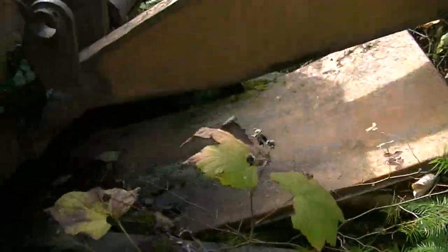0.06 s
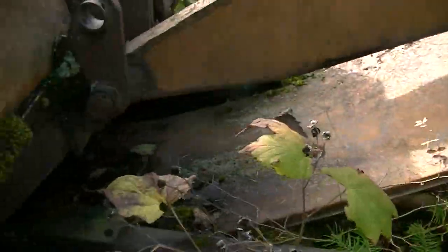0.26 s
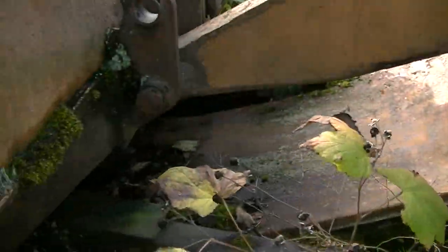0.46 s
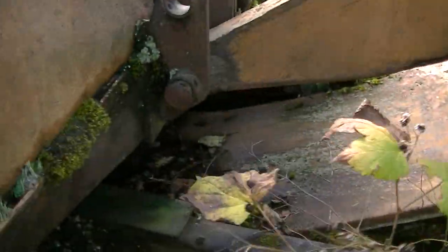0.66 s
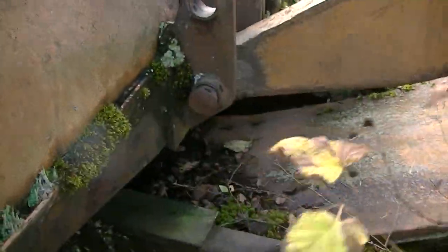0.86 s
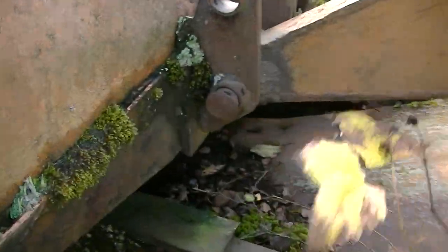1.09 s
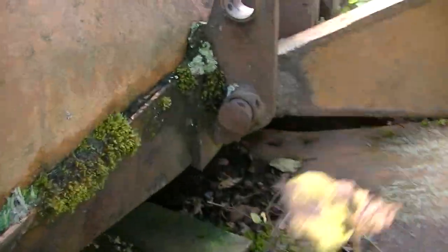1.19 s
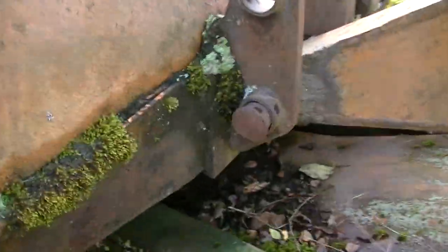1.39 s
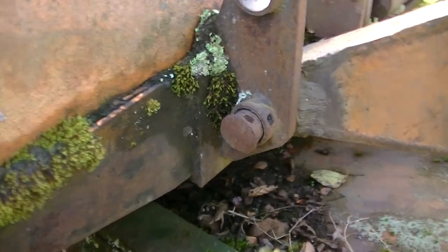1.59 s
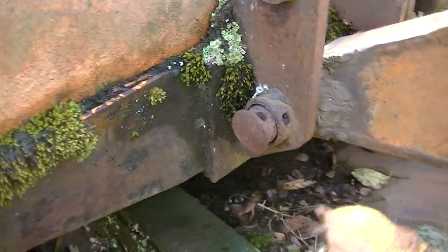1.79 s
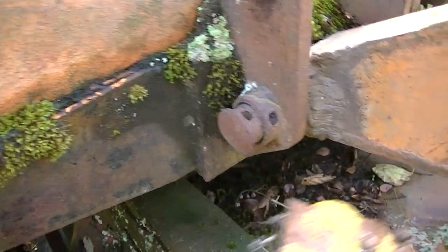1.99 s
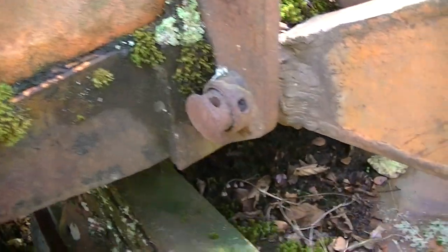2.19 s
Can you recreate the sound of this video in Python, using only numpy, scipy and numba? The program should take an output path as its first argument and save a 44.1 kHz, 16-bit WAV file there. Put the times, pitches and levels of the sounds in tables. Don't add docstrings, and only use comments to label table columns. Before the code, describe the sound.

Dry leaves and brush rustle as a hand pushes through, with sharp little twig snaps

```python
import sys
import numpy as np
from scipy import signal
from scipy.fft import rfft, irfft
from scipy.io import wavfile
from scipy.ndimage import uniform_filter1d, map_coordinates
from numba import njit

SR = 44100
rng = np.random.default_rng(int(sys.argv[2]) if len(sys.argv) > 2 else 0)


def int16_out(signal):
    q = np.round(np.clip(np.atleast_2d(signal).T, -1, 1) * 32767)
    wavfile.write(sys.argv[1], SR, q.astype(np.int16))


def ratio(d):
    e = np.asarray(d, float) / 20
    return 10 ** e


N = 99225
TICK_PAN = 0.044


@njit
def ring(start, hz, cycles, size, pan, rise, n, sr):
    out = np.zeros((2, n))
    for k in range(len(start)):
        first = int(start[k])
        turn = np.exp((2j * np.pi - 1 / cycles[k]) * hz[k] / sr)
        fade = np.exp(-hz[k] / sr / rise)
        offset = 1 + first - start[k]
        phasor = size[k] * turn ** offset
        unrisen = fade ** offset
        end = min(n, first + int(5 * cycles[k] * sr / hz[k]) + 2)
        for j in range(max(first + 1, 0), end):
            sample = phasor.imag * (1 - unrisen)
            out[0, j] += sample
            out[1, j] += sample * pan[k]
            phasor = phasor * turn
            unrisen = unrisen * fade
    return out


def ticks(start_s, hz, cycles, size, pan):
    values = np.broadcast_arrays(start_s, hz, cycles, size, pan)
    start_s, hz, cycles, size, pan = (np.ravel(v) * 1. for v in values)
    hz = np.clip(hz, 100, SR * .4)
    decay_cycles = np.maximum(cycles / 2, .2)
    rise_cycles = .3
    return ring(start_s * SR, hz, decay_cycles, size, pan, rise_cycles, N, 1. * SR)


def walk(rate_per_s):
    levels = rng.standard_normal(400)
    return map_coordinates(levels, [np.arange(N) / SR * rate_per_s], order=3)


def unit(x):
    return x / np.sqrt(np.mean(x[0] ** 2))


def leaves():
    # time_s, level_db, tilt_db_per_octave
    push = [(0, -48, -1.5), (.11, -45, -2), (.17, -41, -2), (.26, -33.5, -1), (.46, -30.5, -1.5),
            (0.529, -28, 0.5), (0.581, -27.5, -0.5), (.67, -28.5, -0.5), (.70, -21, -0.5), (.76, -25, 0),
            (.85, -26.5, -1), (0.928, -25, -0.5), (1.05, -32, -0.5), (1.11, -29, -0.5), (1.3, -34.5, -0.5),
            (1.42, -38.5, 0), (1.87, -42, -1.5), (2.25, -43.5, -1.5)]
    # freq_hz, density_db
    leaf = [(100, -27), (250, -21), (450, -12), (1000, -4.5), (2000, -2.5), (4500, -7.5), (8500, -14),
            (16000, -37.5)]
    ticks_per_s, tick_cycles, scatter_db = 9000, 1.62, 2
    hush_db = -2
    flutter_db, flutter_per_s = 1.1, 58
    patch_db, patch_per_s = .8, 30

    count = int(ticks_per_s * N / SR)
    when, pitch, strength, sign = rng.random((count, 4)).T
    hz = 300 * 50 ** pitch
    size = ratio(-scatter_db * np.log(1 - .98 * strength)) * np.sign(sign - .5) * hz / 1000
    pan = TICK_PAN * rng.standard_normal(count)
    grains = unit(ticks(when * N / SR, hz, tick_cycles, size, pan))
    hush = rng.standard_normal((2, N)) * np.array([[1], [TICK_PAN]])

    freq = np.maximum(np.arange(N // 2 + 1) * SR / N, 1)
    smooth = np.sqrt(uniform_filter1d(np.abs(rfft(grains[0])) ** 2, size=800) / N)
    leaf_hz, leaf_db = np.array(leaf).T
    colour = ratio(np.interp(np.log(freq), np.log(leaf_hz), leaf_db))
    spectrum = (rfft(grains) / smooth + ratio(hush_db) * rfft(hush)) * colour

    push_s, push_db, push_tilt = np.array(push).T
    t = np.arange(N) / SR
    tilt = np.interp(t, push_s, push_tilt)
    octave = np.clip(np.log2(freq / 2000), -3, 3)
    out = 0
    for centre in range(-3, 4):
        window = np.cos(np.pi / 2 * np.clip(octave - centre, -1, 1)) ** 2
        patch = irfft(spectrum * window, N)
        out = out + patch * ratio(tilt * centre + patch_db * walk(patch_per_s))
    return unit(out) * ratio(np.interp(t, push_s, push_db) + flutter_db * walk(flutter_per_s))


def scrapes():
    # middle_s, length_s, level_db, ring_hz
    drags = [(0.361, 0.037, -35, 1500), (0.516, 0.044, -25, 2900), (.61, 0.033, -23.5, 1330),
             (0.729, 0.022, -38, 2600), (0.791, 0.022, -30, 1600), (0.937, 0.037, -30, 1430),
             (1.111, 0.036, -32.5, 1640), (1.247, 0.0093, -35, 710), (1.699, 0.034, -37.5, 2440),
             (1.812, 0.03, -42.5, 1370), (1.923, 0.034, -39.5, 1920), (1.928, 0.023, -37, 5060),
             (2.005, 0.055, -53, 8000), (2.089, 0.016, -37, 4020), (1.268, 0.027, -36.5, 7240)]
    count, cycles, spread_oct = 250, 1.86, 0.43
    middle, length, db, hz = np.array(drags).T[:, :, None]
    draws = rng.standard_normal((len(drags), count, 4))
    place, pitch, strength, side = draws.transpose(2, 0, 1)
    size = ratio(db) * 2 * strength * np.sqrt(length * hz / count)
    start = middle + length / 2 * place
    return ticks(start, hz * 2 ** (spread_oct * pitch), cycles, size, TICK_PAN * side)


def twigs():
    snap_s = [.0045, .070, .180, .250, .376, .4645, .537, .685, .8612, .878, .890, .9018, 1.013, 1.2225,
              1.2328, 1.256, 1.452, 1.6503, 1.742, 1.8953, 1.8992, 2.083, 2.1205, 2.208]
    # peak_db, ring_hz, burst_s, crack_db
    snaps = [(-31, 1800, 0.009, -34), (-24, 2500, 0.0032, -12), (-32, 1330, 0.012, -12),
             (-22.5, 1150, 0.0042, -15), (-19.5, 2000, 0.00282, -47), (-14.5, 1070, 0.0015, -18),
             (-17, 3300, 0.0024, -23), (-18, 2100, 0.0032, -1), (-18, 2000, .0006, -12),
             (-9, 1900, .004, -8), (-17, 5500, .002, -3), (-11, 5000, .002, -4), (-8.5, 3400, 0.0032, -20),
             (-13, 5200, .004, -20), (-16, 5600, .0007, -14), (-9, 2600, .001, -3), (-21, 3000, 0.011, -20),
             (-13.5, 2900, .004, -8), (-28, 2200, 0.0036, -9), (-24, 2600, .0006, -14),
             (-12, 2600, .002, -8), (-28, 1960, 0.0059, 1), (-20, 3200, 0.0024, -12),
             (-22, 2400, 0.002, -20)]
    count, pan_spread = 40, 0.16
    ring_cycles, ring_spread_oct = 1.7, 0.48
    crack_hz, crack_cycles = 8100, 2.2
    first_db, after_db = -18, -8

    start = np.array(snap_s)[:, None]
    db, hz, length, crack_db = np.array(snaps).T[:, :, None]
    draws = rng.random((len(snaps), count, 4))
    delay, strength, pitch, side = draws.transpose(2, 0, 1)
    later = np.arange(count) > 0
    wait = -2 * np.log(1 - delay) * later
    crowd = np.minimum(1, np.sqrt(2 * length * hz / ring_cycles / count))
    tearing = ratio(after_db) * crowd * np.exp(-wait / 2) * 2 * (2 * strength - 1)
    size = 2 * ratio(db) * np.where(later, tearing, ratio(first_db))
    pan = pan_spread * (2 * side - 1)
    t = start + wait * length
    ring_hz = hz * 2 ** (2 * ring_spread_oct * (2 * pitch - 1) * later)
    bright_hz = crack_hz * 2 ** (1.6 * (side - .5) * later)
    rings = ticks(t, ring_hz, ring_cycles, size, pan)
    cracks = ticks(t, bright_hz, crack_cycles, size * ratio(crack_db), pan)
    return rings + cracks


def fibres():
    # start_s, level_db, ring_hz
    fibre_breaks = [(0.0045, -55, 8270), (0.0048, -34, 1210), (0.008, -37, 1380), (0.0705, -53, 8440),
                    (0.0708, -58, 10510), (0.0782, -41, 3270), (0.1001, -45, 5860), (0.165, -44, 6370),
                    (0.1812, -47, 7750), (0.1856, -38, 3620), (0.2509, -26, 1030), (0.3774, -26, 2930),
                    (0.3776, -31, 7240), (0.3785, -31, 5860), (0.3788, -26, 4310), (0.3792, -21, 1210),
                    (0.4655, -21, 1550), (0.509, -18, 2410), (0.5369, -23, 5510), (0.5376, -19, 3100),
                    (0.6059, -18, 1210), (0.6259, -25, 4130), (0.6853, -33, 10510), (0.6853, -22, 5680),
                    (0.6869, -22, 6720), (0.6921, -21, 4130), (0.7283, -18, 3100), (0.7316, -17, 2240),
                    (0.8611, -17, 1720), (0.8781, -26, 8100), (0.8781, -25, 5170), (0.8796, -14, 1720),
                    (0.8797, -33, 10510), (0.8797, -26, 6550), (0.8902, -25, 5340), (0.8913, -25, 8270),
                    (0.8916, -35, 11370), (0.8921, -26, 5170), (0.9015, -34, 10850), (0.9015, -21, 3960),
                    (0.9018, -19, 6200), (0.9031, -21, 5510), (0.9037, -19, 3960), (1.0133, -23, 4130),
                    (1.1068, -26, 3960),
                    (1.2225, -16, 5000), (1.2231, -31, 7410), (1.2245, -20, 3100), (1.2265, -31, 7240),
                (1.2278, -25, 4820), (1.228, -24, 1550), (1.2327, -24, 5340), (1.2559, -21, 5680),
                (1.2562, -27, 10340), (1.2563, -21, 7240), (1.2589, -34, 7750), (1.3905, -35, 5340),
                (1.4523, -28, 2930), (1.4537, -40, 7060), (1.4543, -30, 1720), (1.4559, -40, 7750),
                (1.4589, -29, 2930), (1.4996, -38, 5680), (1.6506, -46, 10160), (1.6508, -30, 2760),
                (1.651, -34, 6200), (1.652, -34, 7240), (1.6527, -26, 1890), (1.6531, -28, 3960),
                (1.6539, -44, 9820), (1.6539, -33, 7410), (1.6544, -32, 1890), (1.6561, -29, 1720),
                (1.658, -37, 6370), (1.7006, -38, 5510), (1.7189, -44, 7240), (1.7429, -34, 2760),
                (1.8955, -41, 7240), (1.8955, -30, 2410), (1.8957, -38, 5860), (1.8992, -30, 5510),
                (1.8999, -28, 7060), (1.9, -36, 9650), (1.9044, -42, 9650), (1.9045, -38, 5860),
                (1.9057, -37, 7060), (1.9065, -34, 2930), (1.9384, -49, 10510), (2.0835, -35, 4310),
                (2.0838, -48, 10160), (2.0842, -36, 5860), (2.085, -28, 1890), (2.0867, -41, 7750),
                (2.0887, -35, 3960), (2.1208, -35, 3790), (2.2083, -53, 11020), (2.2084, -32, 2760),
                (2.2087, -29, 1380),
                    (1.2226, -42, 14000),
        (1.2329, -39, 14800),
        (1.2557, -34, 14000),
        (1.2227, -22, 4100),
        (1.8991, -39, 12500),
        (1.8992, -43, 15000),
        (1.9012, -26, 2100),
        (.0048, -36, 2400),
        (.006, -38, 3000),
    ]
    level_db, decay_s, min_cycles, lead_cycles = 10, .0005, 1.1, .35
    t, db, hz = np.array(fibre_breaks).T
    sign, side = rng.random((len(t), 2)).T
    cycles = 2 * np.maximum(decay_s * hz, min_cycles)
    size = ratio(db + level_db) * np.sign(sign - .3)
    return ticks(t - lead_cycles / hz, hz, cycles, size, TICK_PAN * (2 * side - 1))


def breaks():
    # start_s, level_db, ring_hz, decay_cycles
    clicks = [
        (1.2561, 10, 2050, .6),
        (1.8996, 7, 1700, .5),
        (1.9005, -1, 1500, .7),
    ]
    t, db, hz, cycles = np.array(clicks).T
    return ticks(t, hz, cycles, ratio(db), TICK_PAN)


def thicket(x):
    level_db, t60_s, build_s = -12, 0.03, 0.0033
    t = np.arange(SR // 8) / SR
    envelope = np.exp(-np.log(1000) * t / t60_s) * np.minimum(t / build_s, 1)
    tail = rng.standard_normal((2, len(t))) * envelope
    tail = tail / np.sqrt(np.sum(tail[0] ** 2)) * np.array([[1], [TICK_PAN]])
    return x + ratio(level_db) * signal.fftconvolve(x[:1], tail, axes=1)[:, :N]


def port_difference(side):
    # freq_hz, gain_db
    ports = [(200, 2), (700, 2), (1300, -10), (2400, 2.5), (4400, 4.5), (6300, 0.5), (10000, 6.5),
             (15000, -1)]
    wander_db, wander_per_s = 6.5, 8.92
    log_freq = np.log(np.arange(N // 2 + 1) * SR / N + 1)
    port_hz, port_db = np.array(ports).T
    gain = ratio(np.interp(log_freq, np.log(port_hz), port_db))
    return irfft(rfft(side) * gain, N) * ratio(wander_db * walk(wander_per_s))


def hiss():
    level_db = np.array([[-80], [-100]])
    return signal.lfilter([1], [1, -.8], rng.standard_normal((2, N))) * ratio(level_db)


def rumble(x):
    level_db, follow, shared = -91.5, 0.27, .2
    loud = uniform_filter1d(x[0] ** 2, size=1500) ** (follow / 2)
    low = signal.lfilter([1], [1, -.98], rng.standard_normal(x.shape)) * ratio(level_db) * loud
    return low + shared * low[::-1]


def scene():
    wood = scrapes() + twigs() + fibres() + breaks()
    band = signal.butter(2, (350, 16500), "band", fs=SR, output="sos")
    wood = signal.sosfilt(band, wood)
    mid, side = leaves() + thicket(wood) + hiss()
    side = port_difference(side)
    return np.array([mid + side, mid - side])


def roll_off(x):
    return signal.sosfilt(signal.butter(12, 16810, fs=SR, output="sos"), x)


def record(dry):
    low_cut = signal.butter(3, 372, "high", fs=SR, output="sos")
    cut = signal.sosfilt(low_cut, dry)
    treble_limit = signal.ellip(10, .2, 60, 15850, fs=SR, output="sos")
    mix = signal.sosfilt(treble_limit, cut + rumble(cut))
    return roll_off(mix)


dry = scene()
out = record(dry)
int16_out(out)
```